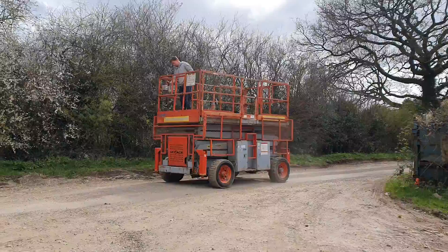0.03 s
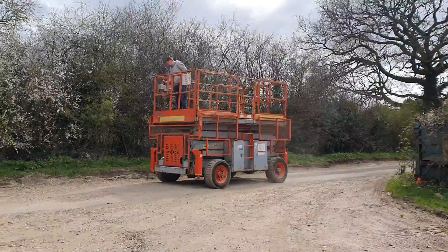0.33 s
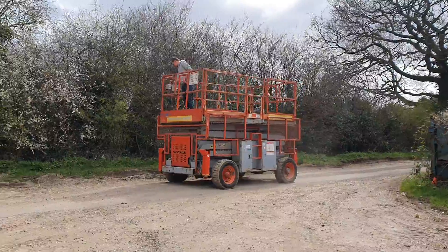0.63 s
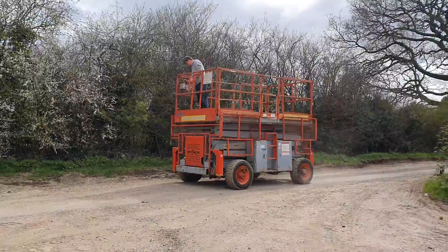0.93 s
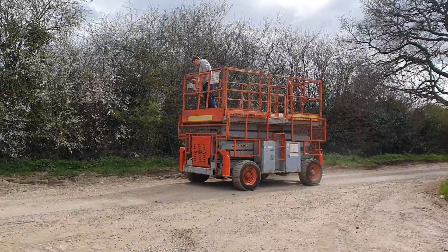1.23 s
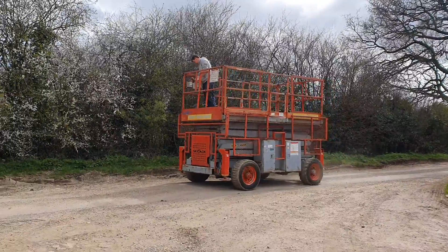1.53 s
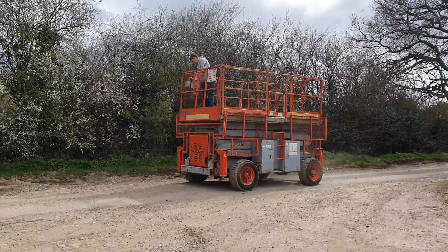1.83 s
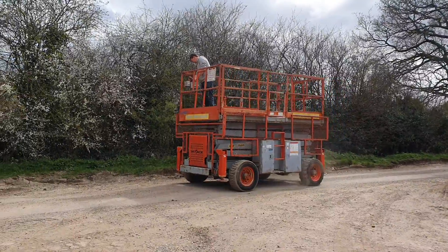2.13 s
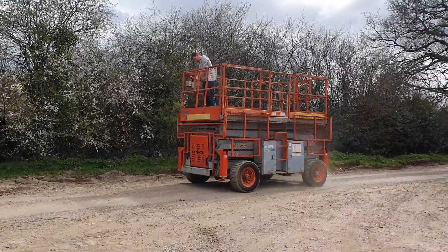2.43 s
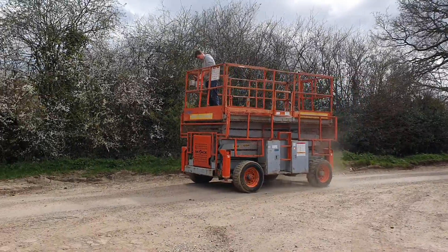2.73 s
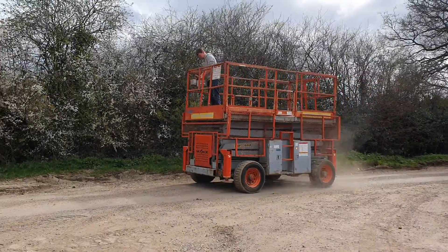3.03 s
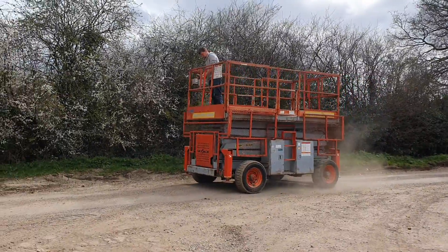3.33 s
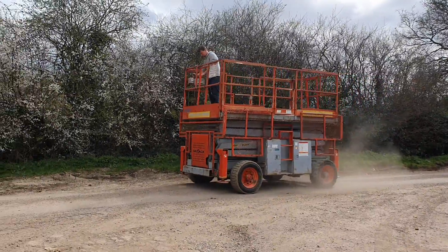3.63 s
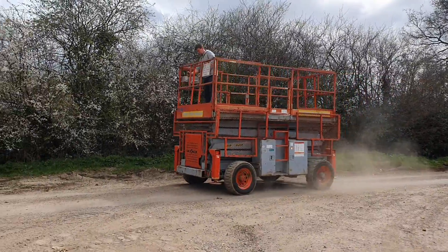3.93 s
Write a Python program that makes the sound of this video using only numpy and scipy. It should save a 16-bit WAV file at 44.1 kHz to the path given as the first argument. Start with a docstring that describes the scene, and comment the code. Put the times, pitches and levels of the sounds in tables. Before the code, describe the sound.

A scissor lift's diesel engine drones with rattling covers and a hydraulic hum as it drives over gravel outdoors, slightly right of the microphone. Near the end the engine sags and growls, tyres scrub stones and the chassis knocks once.

```python
"""On open gravel, a scissor lift drives slowly a little to the right of the microphone.
Its three-cylinder diesel drones at full speed: the exhaust pulses, block and covers rattle, the
hydraulic drive hums. As it turns, the exhaust grows rougher and hollower. Near the end the throttle
closes: the engine sags, fires unevenly and growls against the groaning drive, while the tyres scrub
the stones and the chassis knocks once."""
import sys
import numpy as np
from scipy.fft import rfft, irfft, next_fast_len
from scipy.io import wavfile
from scipy.ndimage import map_coordinates

SR = 44100
rng = np.random.default_rng(int(sys.argv[2]) if len(sys.argv) > 2 else 0)


def to_wav(sig):
    """Store sig (one row per channel, or 1-D mono) as 16-bit WAV at the path in sys.argv[1].

    Samples outside -1..1 are clipped; the rate is SR.
    """
    pcm = np.clip(np.atleast_2d(sig), -1, 1) * 32767
    pcm = np.round(pcm).astype(np.int16)
    wavfile.write(sys.argv[1], SR, pcm.T)  # frames by channels


N = 176400

# engine speed: time_s, firings_per_s
ENGINE_SPEED = [(0, 71), (.4, 72.6), (1.0, 71.3), (2.1, 71.5), (2.8, 71.6), (3.26, 72.6), (3.36, 69.5),
                (3.46, 68.3), (3.56, 60.5), (3.65, 55.6), (3.78, 54.6), (3.88, 58.6), (4, 65)]
# exhaust strength as the throttle closes: time_s, gain_db
THROTTLE = [(0, -1), (2.5, -1), (3.4, -0.1), (3.46, -8), (3.49, -14), (3.7, -19), (3.82, -9), (3.9, -27),
            (4, -21)]
# exhaust tones before and after the turn: multiple_of_cycle, facing_db, turned_db
EXHAUST_ORDERS = [(3, -14, -17), (4, -26, -24), (6, -17, -20.5), (8, -39, -35), (9, -26.5, -26.5),
                  (12, -32.5, -25.5), (14, -45, -44), (15, -43, -37), (18, -42, -43.5), (21, -38.5, -49),
                  (26, -50, -42), (40, -51, -49), (45, -48.5, -59)]
# uneven part of the firings: time_s, level_db
UNEVEN_LEVEL = [(0, -26), (.5, -49), (1.3, -49), (2.1, -31.5), (3.35, -30), (3.5, -29.5), (3.8, -29),
                (4, -27.5)]
# response of the exhaust pipe: frequency_hz, gain_db
PIPE_SPECTRUM = [(20, -36), (42, -5), (58, -2.5), (85, 0), (115, -6.5), (200, -8), (310, -18.5), (400, -20),
                 (600, -32), (1500, -90)]
# single heavy firings with the throttle closed: time_s, peak_db
CHUFFS = [(3.456, -16), (3.533, -18.5), (3.603, -17), (3.657, -15.5), (3.732, -14.5), (3.817, -17)]
# gas puffs: frequency_hz, gain_db
RASP_SPECTRUM = [(150, 11), (260, -3), (330, 7), (420, 3.5), (560, -9), (800, -7.5), (1500, -59)]
# ring of the engine block: frequency_hz, gain_db
BLOCK_SPECTRUM = [(300, -8), (600, -2.5), (830, 4.5), (940, 2.5), (1200, -0.5), (1480, -8), (2030, -6.5),
                  (2400, -10), (5000, -47)]
# loose rattle and fan air: frequency_hz, gain_db
RATTLE_SPECTRUM = [(150, 7), (340, 7), (450, -3), (560, -0.5), (680, 3), (950, -4.5), (1200, -1.5),
                   (1500, -5.5), (2000, -9), (2400, -10.5), (2850, -9.5), (3250, -13), (3700, -13),
                   (4600, -21), (5600, -31), (6200, -25), (7300, -78), (8800, -30.5), (12000, -74),
                   (15500, -50)]
# buzzing sheet-metal covers: pitch_hz, width_hz, relative_db
COVER_MODES = [(655, 17, -16.5), (1261, 78, -14.5), (1895, 140, -12.5), (2064, 51, -17.5), (2605, 65, -24),
               (3466, 69, -25), (3870, 27, -30)]
# block, rattle and covers together: time_s, gain_db
CLATTER_GAIN = [(0, -34.5), (1, -35.5), (2.6, -35), (3.3, -34), (3.8, -34.5), (4, -35)]
# the drive growling against the slowing engine: time_s, level_db
GROWL_LEVEL = [(3.3, -64), (3.5, -52), (3.6, -25), (3.68, -27.5), (3.85, -24.5), (3.92, -30.5), (4, -28)]
# resonances of the drive housing: pitch_hz, width_hz, gain_db
HOUSING_MODES = [(124, 17.6, 3), (172, 75, -3), (283, 39, -3.5), (322, 15.6, 1), (555, 27, -11.5),
                 (628, 13, -13), (815, 38, -12.5)]
# hydraulic hum at top speed, before the throttle gain: pitch_hz, level_db
HUM_TONES = [(170.5, -34), (207, -36), (339, -42.5)]
# tyres scrubbing: time_s, level_db
SCRUB_LEVEL = [(2.9, -56), (3.3, -47.5), (3.47, -36), (3.54, -29.5), (3.64, -31), (3.74, -34), (3.85, -36),
               (3.91, -40)]
# scrubbed stones: frequency_hz, gain_db
SCRUB_SPECTRUM = [(250, -16), (500, -2), (790, 1), (980, -9.5), (1270, -1.5), (1500, -7), (1900, -4),
                  (2600, -11.5), (3600, -12.5), (4500, -25.5), (6050, -29), (6900, -36.5), (11200, -38),
                  (12300, -48), (15500, -49)]
# stones spat out by the tyres: time_s, level_db
SPITS = [(0.431, -56), (0.514, -53), (3.552, -47), (3.638, -52)]
# hiss of a spat stone: frequency_hz, gain_db
SPIT_SPECTRUM = [(2000, -22), (3500, -2), (6000, 1), (7500, -8), (11300, -10), (12500, -31)]
# stones under the rolling tyres: frequency_hz, gain_db
CRUNCH_SPECTRUM = [(800, -10), (2500, 0), (5000, -4), (10000, -14), (15000, -24)]
# likeness of left and right at the microphone: frequency_hz, correlation
MIC_LIKENESS = [(60, 0.14), (250, 0.93), (500, 0.45), (1000, 0.66), (2000, 0.6), (4000, 0.51),
                (10000, 0.11)]
# level across the microphone: frequency_hz, left_minus_right_db
MIC_BALANCE = [(60, -0.5), (250, 0.3), (600, -1.4), (1200, -2.5), (2500, -3.5), (5000, -5.5), (9000, -2),
               (14000, -8.5)]
# phase between the microphone's two ports: frequency_hz, left_minus_right_rad
MIC_PHASE = [(0, 0.98), (600, -0.62), (1980, -0.45), (3600, -1.24)]

TURN_START_S, TURN_END_S = 1.265, 3.02


def exhaust(cycle):
    """Pipe tones: the lowest form a lopsided pulse, higher ones arrive by many paths at any phase."""
    turned = curve([(TURN_START_S, 0), (TURN_END_S, 1)])
    tones = np.zeros(N)
    for order, facing_db, turned_db in EXHAUST_ORDERS:
        waver_db = (0.02 + 0.0794 * order) * wobble(14)
        db = facing_db + (turned_db - facing_db) * turned + waver_db
        lag_rad = .5 + (order > 6) * 2 * np.pi * rng.random()
        tones -= amp(db) * np.sin(2 * np.pi * order * cycle - lag_rad)
    return tones * amp(curve(THROTTLE))


def uneven_firings(cycle, chuff_s=.008, chuff_hz=62):
    """Unequal firings thump through the pipe; with the throttle closed a few heavy ones stand out."""
    pulses = np.array([firings(cycle, steady=0, scatter=size) for size in (0.85, 0.95)])
    thumps = spread(coloured(pulses, PIPE_SPECTRUM)) * amp(curve(UNEVEN_LEVEL))
    for time_s, peak_db in CHUFFS:
        t = np.arange(N) / SR - time_s
        thumps -= amp(peak_db) * np.exp(-np.abs(t) / chuff_s) * np.cos(2 * np.pi * chuff_hz * t)
    return thumps


def gas_rasp(cycle, level_db=-44.5, depth_db=6):
    """A puff of gas noise leaves the pipe with each firing."""
    puffs = amp(depth_db * np.cos(6 * np.pi * cycle)) * rng.standard_normal((2, N))
    return amp(level_db + curve(THROTTLE) / 2) * spread(coloured(puffs, RASP_SPECTRUM))


def clatter(cycle, knock_depth_db=3):
    """The block rings alike in every cycle; loose rattle and covers pulse with the cylinders."""
    pattern = rng.standard_normal((2, 1840))
    repeating = pattern[:, (cycle % 1 * pattern.shape[1]).astype(int)]
    beats = np.cos(2 * np.pi * np.outer([1, 3, 5, 6], cycle - 1 / 2))
    knock = amp(knock_depth_db * (np.array([0.3, 0.11, 0.063, 0.14]) @ beats))
    block = amp(-6) * coloured(repeating * knock, BLOCK_SPECTRUM)
    rattle = amp(0.02) * coloured(rng.standard_normal((2, N)) * knock, RATTLE_SPECTRUM)
    metal = block + rattle + covers(knock)
    gain = amp(curve(CLATTER_GAIN) + 0.55 * wobble(20))
    return gain * np.std(metal) * spread(metal)


def covers(knock, swell_db=1.2, turned_db=-2):
    """Each shaken cover rings in a narrow band that swells and fades; all dim as the machine turns."""
    shaking = knock * rng.standard_normal((2, N))
    rings = sum(amp(db + swell_db * wobble(5.93)) * unit(resonances(shaking, [(hz, width, 0)]))
                for hz, width, db in COVER_MODES)
    return rings * amp(curve([(TURN_START_S, 0), (TURN_END_S, turned_db)]))


def hydraulic_hum(speed, drift=0.0034):
    """The drive follows the engine, beats against the exhaust and fades with the throttle."""
    running_s = np.cumsum(speed / speed.max() * (1 + drift * wobble(4.1))) / SR
    tones = sum(amp(db + 1.2 * wobble(4.8)) * np.sin(2 * np.pi * hz * running_s) for hz, db in HUM_TONES)
    return amp(curve(THROTTLE)) * tones


def drive_growl(cycle):
    """Engine-braking pulses and noise ring the drive housing."""
    noise = 0.83 * rng.standard_normal((2, N))
    pulses = unit(firings(cycle, steady=0.94, scatter=0.56))
    shaking = noise + np.array([pulses, 0.33 * rng.standard_normal(N)])  # pulses in the centre
    return amp(curve(GROWL_LEVEL)) * spread(resonances(shaking, HOUSING_MODES))


def drive_groan(start_s=3.62, length_s=0.29, attack_s=0.041, release_s=0.16):
    """The braking drive holds one rough, slightly rising note of three harmonics."""
    t = np.arange(N) / SR - start_s
    envelope = np.clip(np.minimum(t / attack_s, (length_s - t) / release_s), 0, 1)
    pitch_hz = (276 + 45 * t) * (1 + .012 * wobble(70))
    phase = 2 * np.pi * np.cumsum(pitch_hz) / SR
    return envelope * sum(amp(db + 2 * wobble(60)) * np.sin(k * phase)
                          for k, db in enumerate((-25.5, -37, -44), 1))


def chassis_knock(start_s=3.826, gain_db=-26.5, t60_s=0.18, attack_s=0.0035):
    """The chassis gives one dull knock as the machine lurches."""
    t = np.maximum(np.arange(N) / SR - start_s, 0)
    envelope = amp(gain_db - 60 * t / t60_s) * (1 - np.exp(-t / attack_s))
    return envelope * sum(np.sin(2 * np.pi * hz * t + .5 * wobble(56)) for hz in (166, 341, 536, 682))


def gravel(cracks_per_s=300, crunch_db=-65, spit_s=0.015):
    """Stones crunch faintly under the tyres, rush as the wheels brake, and now and then spit out."""
    def grains():
        """Noise with fine grit and slower surges."""
        return rng.standard_normal((2, N)) * amp(2.6 * wobble(700) + .6 * wobble(45))

    sizes = amp(2 * np.minimum(rng.exponential(size=N), 2))
    cracks = sizes * (rng.random(N) < cracks_per_s / SR) * rng.standard_normal((2, N))
    rolling = amp(crunch_db) * spread(coloured(cracks, CRUNCH_SPECTRUM))
    scrub = amp(curve(SCRUB_LEVEL)) * spread(coloured(grains(), SCRUB_SPECTRUM))
    t = np.arange(N) / SR
    bursts = sum(amp(db) * np.exp(-np.abs(t - time_s) / spit_s) for time_s, db in SPITS)
    return rolling + scrub + bursts * spread(coloured(grains(), SPIT_SPECTRUM))


def firings(cycle, steady, scatter):
    """One impulse per firing, three to a cycle, with scattered sizes."""
    at = np.flatnonzero(np.diff(np.floor(3 * cycle)))
    return np.bincount(at, steady + scatter * rng.uniform(-1.02, 1, len(at)), N)


def amp(db):
    """Decibels to gain."""
    return 10 ** (np.asarray(db) / 20)


def unit(x):
    """Scale to rms 1."""
    return x / np.sqrt(np.mean(x ** 2) + 1e-20)


def along(points, hz):
    """Read (frequency_hz, value) points on a log axis."""
    knots_hz, values = np.transpose(points)
    return np.interp(np.log(hz + 1), np.log(knots_hz + 1), values)


def curve(rows):
    """(time_s, value) points as one value per sample."""
    return np.interp(np.arange(N) / SR, *np.transpose(rows))


def wobble(rate):
    """A smooth random curve, rate knots a second."""
    return map_coordinates(rng.standard_normal(int(N * rate / SR) + 4), [np.arange(N) * rate / SR])


def filtered(x, response):
    """x through a complex frequency response."""
    size = next_fast_len(N + SR // 2)
    return irfft(rfft(x, size) * response(np.fft.rfftfreq(size, 1 / SR)), size)[..., :N]


def coloured(x, spectrum):
    """x shaped by a spectrum, at rms 1."""
    return unit(filtered(x, lambda hz: amp(along(spectrum, hz))))


def resonances(x, modes):
    """x through (pitch_hz, width_hz, gain_db) resonances of alternating sign."""
    return filtered(x, lambda hz: sum(
        (-1) ** k * amp(db) * 1j * hz * width / (pitch ** 2 - hz ** 2 + 1j * hz * width)
        for k, (pitch, width, db) in enumerate(modes)))


def spread(pair):
    """Two unrelated signals become left and right near rms 1, most alike in the upper bass."""
    def weights(hz):
        angle = np.arccos(np.clip(along(MIC_LIKENESS, hz), -1, 1)) / 2
        return np.array([np.cos(angle), np.sin(angle)])

    mid, side = filtered(pair, weights)
    return np.array([mid + side, mid - side]) / np.std(mid)


def scene():
    """One engine speed paces exhaust, clatter, hum and growl, with the gravel underneath."""
    speed = curve(ENGINE_SPEED) * (1 + .001 * wobble(12))
    cycle = np.cumsum(speed) / SR / 3  # engine cycles elapsed, three firings each
    engine = exhaust(cycle) + uneven_firings(cycle) + gas_rasp(cycle) + clatter(cycle)
    drive = hydraulic_hum(speed) + drive_growl(cycle) + drive_groan()
    return engine + drive + chassis_knock() + gravel()


def record(dry):
    """A stereo microphone, the machine a little to its right; its two ports differ in phase."""
    top_hz = 15760
    sides = np.array([[1], [-1]]) / 2

    def response(hz):
        balance = amp(sides * along(MIC_BALANCE, hz))
        phase_rad = sides * along(MIC_PHASE, hz)
        return balance * np.exp(1j * phase_rad) * (hz < top_hz)

    return filtered(dry, response)


dry = scene()
out = record(dry)
to_wav(out)
```